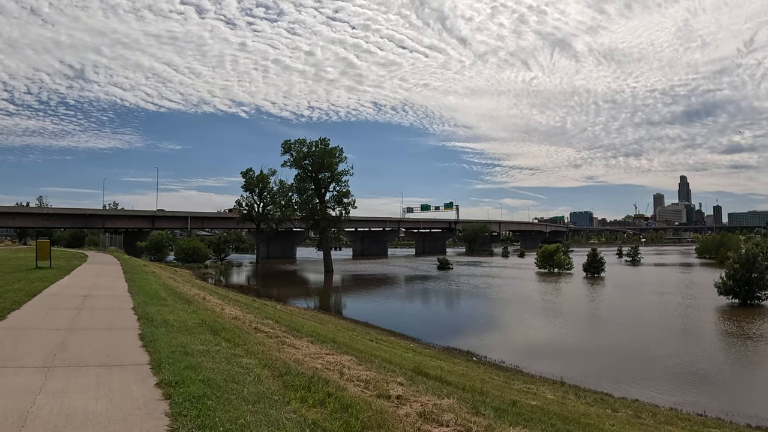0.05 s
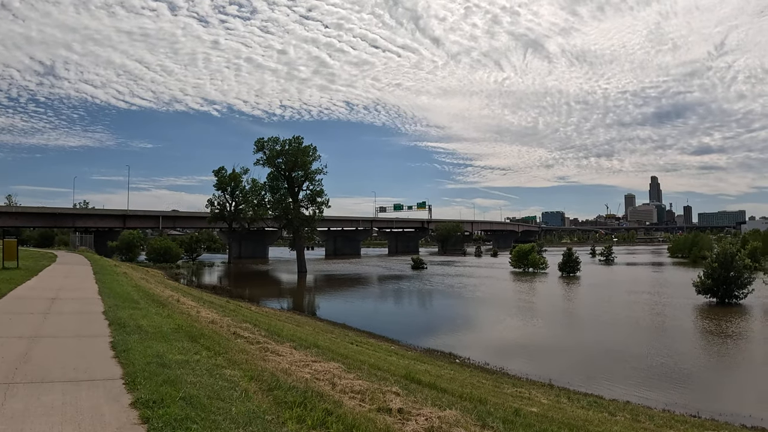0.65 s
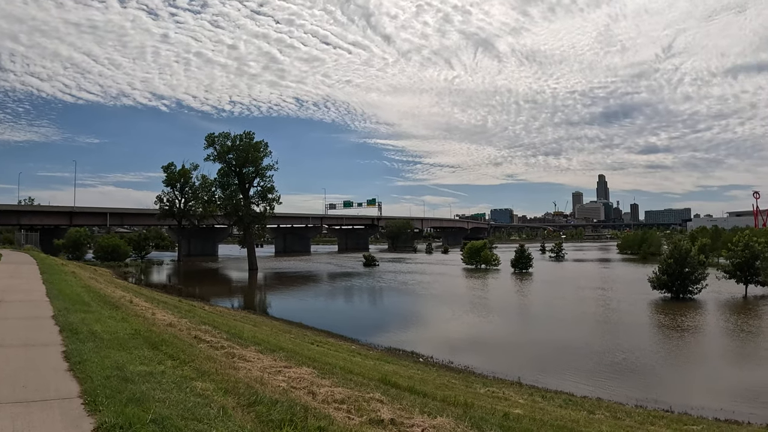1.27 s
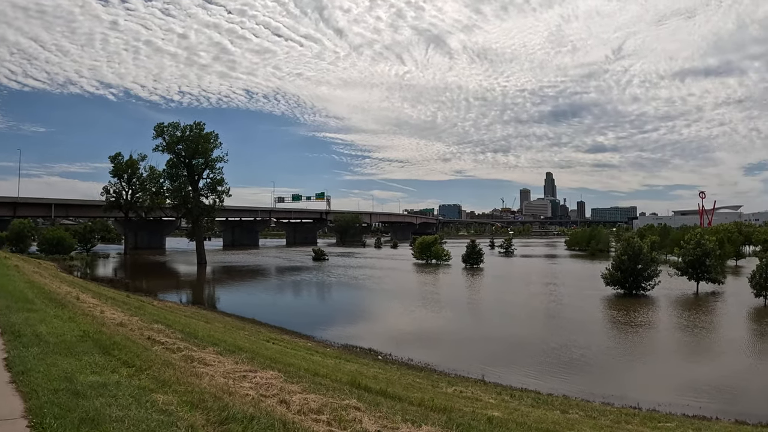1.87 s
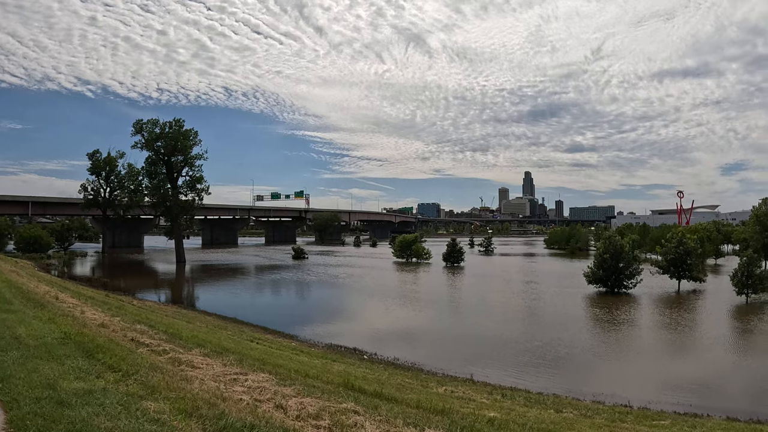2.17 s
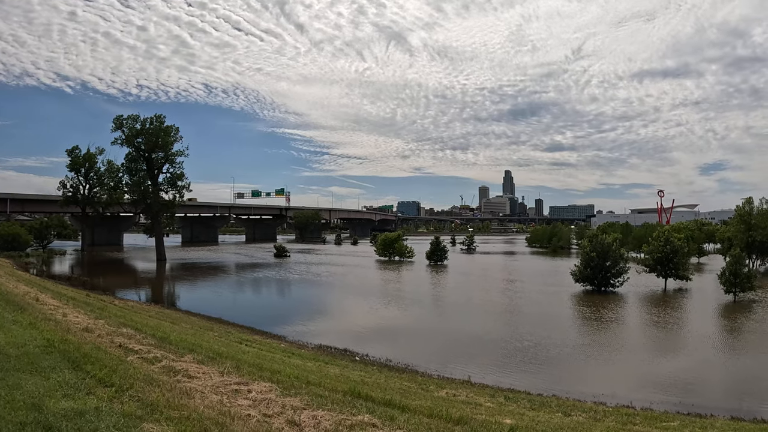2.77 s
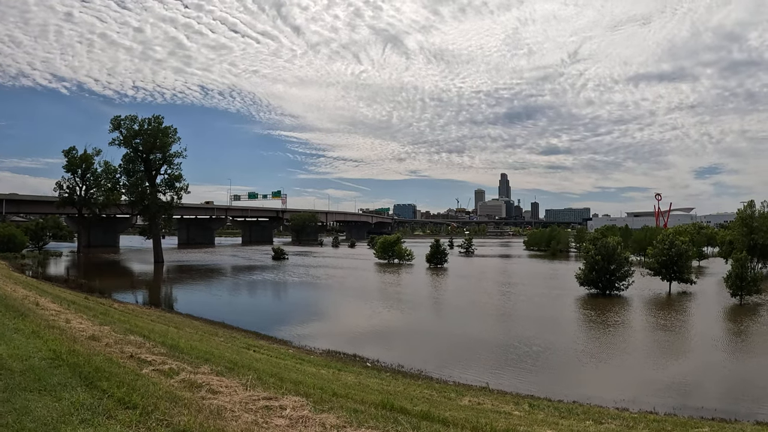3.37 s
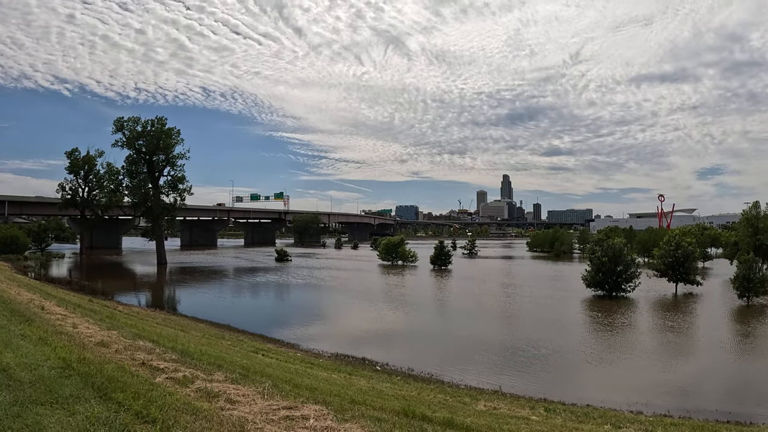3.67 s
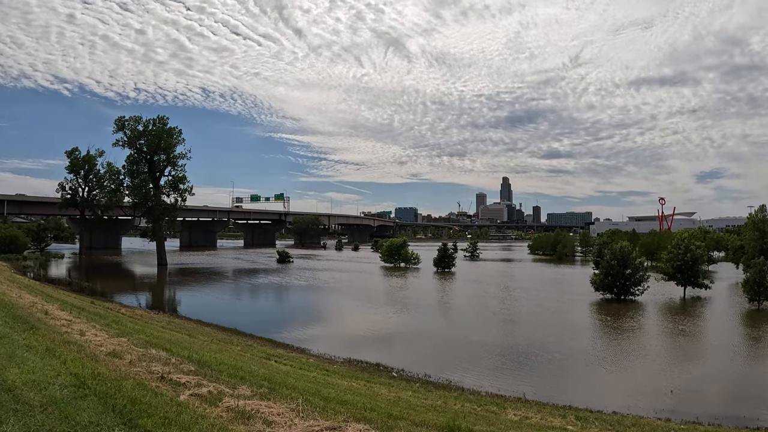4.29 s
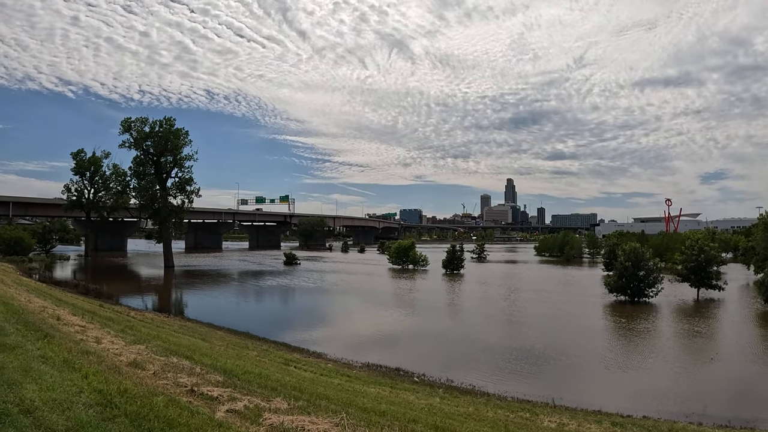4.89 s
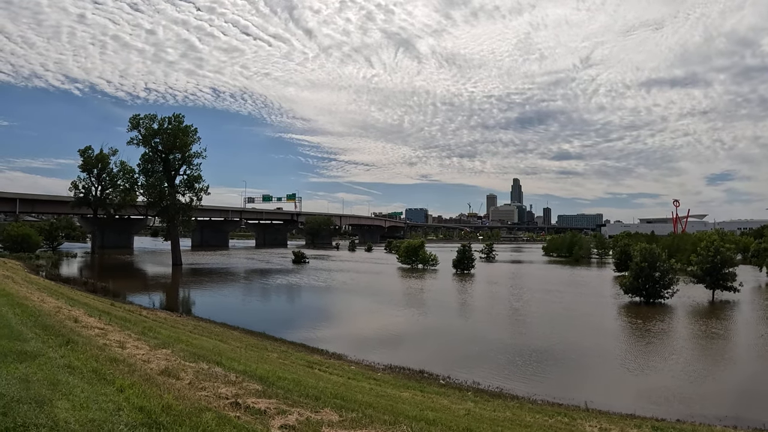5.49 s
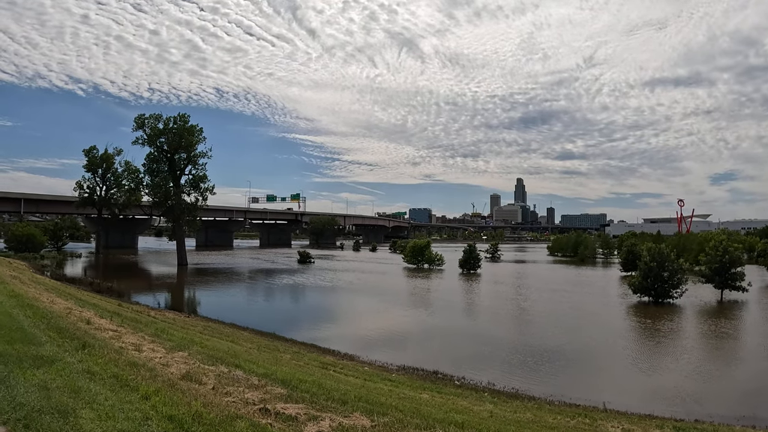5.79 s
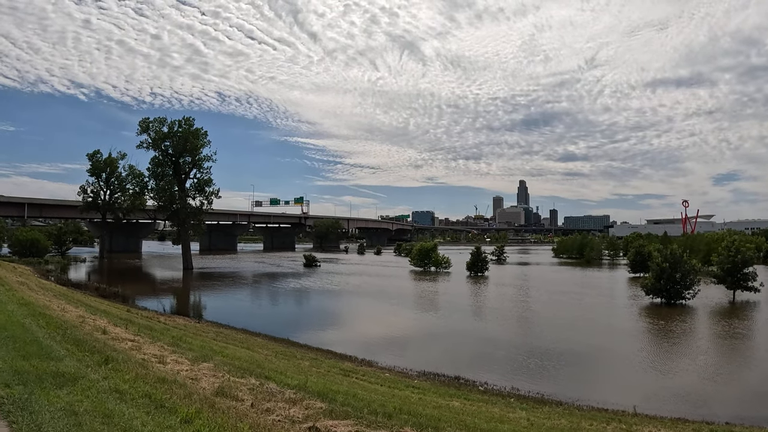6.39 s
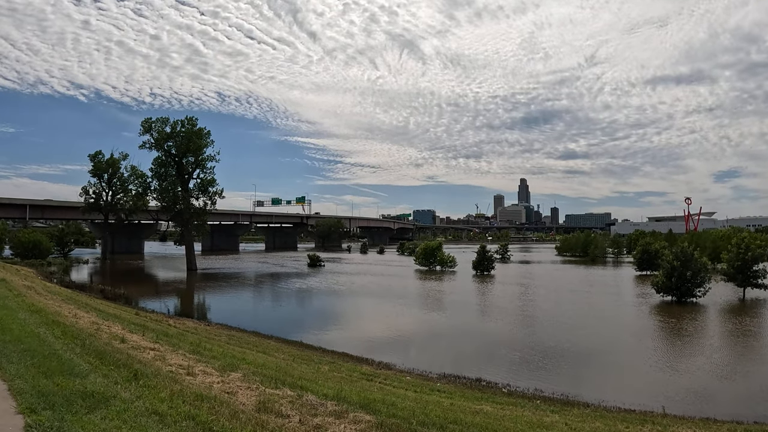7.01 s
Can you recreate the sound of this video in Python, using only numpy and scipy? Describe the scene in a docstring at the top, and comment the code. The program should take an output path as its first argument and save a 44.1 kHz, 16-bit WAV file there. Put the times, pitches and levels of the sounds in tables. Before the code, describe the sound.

A heavy engine climbs in pitch and holds over rumbling highway bridge traffic, while wind buffets the microphone and a small bird chips.

```python
"""A heavy engine climbs in pitch and holds on a highway bridge, heard from a grassy river bank.
Its exhaust beats against a second engine's drone; tyres roar and whine, and the deck rumbles.
Close by, two gusts buffet the microphone, a small bird chips, grass and clothing rustle, stalks snap.
Near the end the stereo image closes to mono and the treble dulls."""
import sys
import numpy as np
from scipy import signal
from scipy.fft import rfft, irfft, next_fast_len
from scipy.io import wavfile

SR = 44100
rng = np.random.default_rng(int(sys.argv[2]) if len(sys.argv) > 2 else 0)


def int16_out(signal):
    """Quantize to a 16-bit WAV file."""
    q = np.round(np.clip(np.atleast_2d(signal).T, -1, 1) * 32767)
    wavfile.write(sys.argv[1], SR, q.astype(np.int16))


N = 319725
TIME = np.arange(N) / SR
BINS = np.fft.rfftfreq(N, 1 / SR)


def gain_of(db):
    """Decibels to amplitude."""
    return 10 ** (np.asarray(db) / 20)


def unit_rms(x):
    """Scales to unit rms."""
    return x / np.sqrt(np.mean(x ** 2) + 1e-20)


def automation(points):
    """A breakpoint curve over time, at every sample."""
    return np.interp(TIME, *np.transpose(points))


def eq_curve(points, hz=BINS):
    """A breakpoint curve over log frequency."""
    point_hz, value = np.transpose(points)
    return np.interp(np.log(hz + 1), np.log(point_hz + 1), value)


def filtered(x, gain):
    """Applies a gain for each frequency."""
    return irfft(rfft(x) * gain, x.shape[-1])


def drift(rate_hz):
    """Smooth random modulation of unit rms, up to about rate_hz."""
    return unit_rms(filtered(rng.standard_normal(N), np.exp(-(BINS / rate_hz) ** 2)))


def stereo_noise(colour, correlation, size=N):
    """Coloured noise in two partly alike channels; their mean has unit rms."""
    mid, side = rfft(rng.standard_normal((2, size)))
    mid, side = mid * np.sqrt(1 + correlation), side * np.sqrt(1 - correlation)
    pair = irfft(np.array([mid + side, mid - side]) * colour, size)
    return pair / np.sqrt(np.mean(pair.mean(0) ** 2) + 1e-20)


def pan(left_db):
    """Channel gains that put the left left_db above the right."""
    return gain_of(np.array([[.5], [-.5]]) * left_db)


def add(mix, start_s, sound):
    """Mixes a stereo sound in at start_s."""
    part = mix[:, max(round(start_s * SR), 0):][:, :sound.shape[1]]
    part += sound[:, :part.shape[1]]


def add_centred(mix, peak_s, sound):
    """Mixes a stereo sound in with its middle at peak_s."""
    add(mix, peak_s - sound.shape[1] / SR / 2, sound)


def tone(hz):
    """A unit-rms sine that follows a pitch curve from a random phase."""
    return np.sqrt(2) * np.sin(2 * np.pi * (np.cumsum(hz) / SR + rng.random()))


def swell(width_s):
    """A short bell envelope, three widths to each side of its peak."""
    return np.exp(-np.linspace(-3, 3, 2 * int(3 * width_s * SR) + 2) ** 2)


def swell_at(peak_s, width_s):
    """A bell envelope on the scene's timeline."""
    return np.exp(-((TIME - peak_s) / width_s) ** 2)


def drone(hz, zero_phase_s=3.23):
    """An engine's fundamental: a gliding unit-rms sine with its phase pinned at one moment."""
    turns = np.cumsum(hz) / SR
    return np.sqrt(2) * np.sin(2 * np.pi * (turns - np.interp(zero_phase_s, TIME, turns)))


# Firing rate, climbing in two pulls and then holding: time_s, pitch_hz
ENGINE_PITCH = [(0, 92), (1.0, 97.5), (1.85, 105), (1.95, 111), (2.07, 126), (2.27, 143.5), (2.42, 146),
                (2.6, 160.6), (3.1, 161.1), (3.5, 162.4), (3.9, 164.8), (5.4, 168.3), (7.25, 163.5)]
# Engine fader: time_s, level_db
ENGINE_FADER = [(0, -35.5), (.25, -28.5), (.62, -28), (.85, -24), (1.7, -26.5), (2.12, -22.5), (2.27, -28),
                (2.6, -26), (3.9, -29.5), (4.6, -23), (5.3, -24), (5.5, -29.5), (5.85, -29), (6.05, -45.5),
                (6.35, -31.5), (6.75, -38), (6.98, -26.5), (7.25, -41.5)]
# Second harmonic against the fundamental: harmonic_hz, gain_db
ENGINE_OVERTONE = [(184, -6.5), (192, -12), (210, -14), (235, -23.5), (290, -27), (320, -36.5), (328, -20),
                   (333, -26.5), (336, -22.5)]


def heavy_engine(throb_db=0.4, trim_db=-0.67):
    """A throbbing exhaust; distance leaves only its lowest orders."""
    hz = automation(ENGINE_PITCH)
    firing = drone(hz) * gain_of(throb_db * drift(1.4))
    # Unequal cylinder banks add weak orders halfway between the harmonics.
    uneven = gain_of(-15) * tone(hz / 2) + gain_of(-29 + 2 * drift(3.5)) * tone(1.5 * hz)
    overtone = gain_of(eq_curve(ENGINE_OVERTONE, 2 * hz) + drift(2.5)) * tone(2 * hz)
    return gain_of(automation(ENGINE_FADER) + trim_db) * (firing + uneven + overtone)


def cruising_engine(start_hz=154.3, rise_hz_per_s=0.6, peak_db=-32, arrives_s=0.38, leaves_s=3.9,
                    fade_db_per_s=15.5, nearing_db_per_s=1.1):
    """A second drone swells in, draws nearer and fades, beating against the heavy engine."""
    away_s = np.maximum(arrives_s - TIME, 0) + np.maximum(TIME - leaves_s, 0)
    nearing_db = nearing_db_per_s * np.minimum(TIME - leaves_s, 0)
    level_db = peak_db + nearing_db - fade_db_per_s * away_s + 0.1 * drift(0.6)
    # Flipped polarity puts a null of the beat where the two drones' phases are pinned.
    return -gain_of(level_db) * drone(start_hz + rise_hz_per_s * TIME)


# How alike the traffic noise is left and right: frequency_hz, correlation
TRAFFIC_CORRELATION = [(25, 0.98), (100, 1), (200, 0.99), (330, 0.93), (530, 0.91), (900, 0.73),
                       (1500, 0.86), (2600, 0.52), (7000, 0.4)]
# Low end of the bridge deck: frequency_hz, gain_db
DECK_EQ = [(7, -16), (19, -4), (31, 2.5), (49, -4.5), (67, 2), (92, 1.5), (122, -6), (170, -6),
           (212, -18.5), (260, -24), (335, -43), (1500, -100)]
# Deck fader: time_s, level_db
DECK_FADER = [(0, -30.5), (.4, -29.5), (1.15, -29.5), (1.8, -32), (2.6, -32), (3.2, -29.5), (4.7, -32),
              (5.45, -29.5), (6.05, -35), (7.25, -33.5)]
# Colour of the mingled exhausts: frequency_hz, gain_db
EXHAUST_EQ = [(90, -3), (195, 1.5), (255, -1.5), (305, -7.5), (430, -10.5), (530, -8.5), (660, -8),
              (810, -12.5), (1300, -23), (7000, -100)]
# Exhaust fader: time_s, level_db
EXHAUST_FADER = [(0, -40), (1.1, -39), (2.7, -40), (4.0, -38.5), (6.1, -39), (7.25, -36)]


def rumble(deck_trim_db=2.5, exhaust_trim_db=-0.02):
    """The low bed: the deck shakes under the wheels, with a blur of many exhausts above it."""
    correlation = eq_curve(TRAFFIC_CORRELATION)
    deck = stereo_noise(gain_of(eq_curve(DECK_EQ)), correlation)
    deck *= gain_of(automation(DECK_FADER) + deck_trim_db)
    exhausts = stereo_noise(gain_of(eq_curve(EXHAUST_EQ)), correlation)
    exhausts *= gain_of(automation(EXHAUST_FADER) + exhaust_trim_db)
    return deck + exhausts


# Colour of the tyre roar: frequency_hz, gain_db
ROAR_EQ = [(240, -18), (510, -14.5), (670, -3), (820, -6), (970, 1), (1220, 0.5), (1510, -4.5),
           (1780, -5.5), (2450, -14), (3450, -20), (4600, -28), (7400, -37.5), (10200, -56.5), (14400, -65)]
# Roar fader: time_s, level_db
ROAR_FADER = [(0, -40.5), (.9, -42), (2.5, -43.5), (3.1, -42.5), (4.3, -41), (4.85, -40.5), (5.25, -39.5),
              (6.0, -44.5), (7.25, -42)]


def tyre_roar(crossover_hz=2400, flicker_db=0.5, waver_db=0.5):
    """A broad wash of tyres whose treble comes and goes with the breeze."""
    roar = stereo_noise(gain_of(eq_curve(ROAR_EQ)), eq_curve(TRAFFIC_CORRELATION))
    treble = filtered(roar, BINS ** 4 / (BINS ** 4 + crossover_hz ** 4))
    roar += treble * (gain_of(flicker_db * drift(16)) - 1)
    return roar * gain_of(automation(ROAR_FADER) + waver_db * drift(29))


def resonant_noise(size, pitch_hz, half_band_hz):
    """Noise in one narrow resonance."""
    detune = (np.fft.rfftfreq(size, 1 / SR) - pitch_hz) / half_band_hz
    return stereo_noise(1 / (1 + detune ** 2), correlation=0.38, size=size)


# Singing tyres passing: peak_s, width_s, level_db, pitch_hz, half_band_hz
TYRE_WHINES = [(4.1, 0.51, -47.5, 1218, 36), (5.15, 0.2, -45, 1257, 27), (5.22, 0.18, -50.5, 1870, 64),
               (5.401, .25, -50.5, 1424, 25), (5.63, 0.15, -42, 1252, 26), (5.95, .1, -48, 1262, 10),
               (6.36, .07, -49, 1420, 11), (6.74, 0.09, -46, 1270, 11), (7.069, 0.067, -53, 1310, 20),
               (7.2, .03, -39, 630, 44)]


def tyre_whines(bed_db=-56):
    """Tyres sing on the grooved deck, pitched by each vehicle's speed, over a faint steady whine."""
    out = gain_of(bed_db) * resonant_noise(N, pitch_hz=1250, half_band_hz=34)
    for peak_s, width_s, level_db, pitch_hz, half_band_hz in TYRE_WHINES:
        envelope = swell(width_s)
        whine = resonant_noise(next_fast_len(len(envelope)), pitch_hz, half_band_hz)
        add_centred(out, peak_s, gain_of(level_db) * envelope * whine[:, :len(envelope)])
    return out


# The far vehicle's partials at its closest: pitch_hz, level_db
FAR_PARTIALS = [(247, -56), (320, -58), (387.5, -50.5), (409, -56), (457.5, -49.5), (648, -55.5)]


def far_vehicle(wander_hz=1.4, distant_db=-13.5, nearest_s=6.98, approach_s=0.37):
    """Thin tones waver on their way through moving air and swell as the vehicle draws near."""
    partials = sum(gain_of(db) * tone(hz + wander_hz * drift(6.3)) for hz, db in FAR_PARTIALS)
    return partials * np.hypot(gain_of(distant_db), swell_at(nearest_s, approach_s))


# The traffic's lean to the left: frequency_hz, left_db
LEAN_PAN = [(60, -0.5), (140, -1), (320, 0.5), (490, 0), (740, 5), (1130, 2.5), (1720, 3.5), (2620, 4.5),
            (5000, 1.2), (9000, 1.5)]
# Depth of that lean: time_s, depth_factor
LEAN_DEPTH = [(0, 0.63), (2.5, 1.6), (4.6, 1.23), (5.7, .45), (7.25, .4)]


def from_left(traffic):
    """The bridge lies to the left; the camera body shades the right channel from its higher sounds."""
    shaded = filtered(traffic, pan(eq_curve(LEAN_PAN)))
    return traffic + automation(LEAN_DEPTH) * (shaded - traffic)


# Wind thumps, bunched in two gusts: peak_s, width_s, level_db, cutoff_hz, left_db
EDDIES = [(.18, 0.059, -24, 45.2, 2), (0.293, 0.02, -22.5, 277, -12.5), (.372, 0.028, -26.5, 227, -13),
          (.52, 0.029, -30, 240, -4.5), (0.684, 0.027, -17.5, 55, -1.5), (0.96, 0.028, -18, 60, 0),
          (1.1, 0.049, -21, 41.6, 0), (1.135, 0.035, -23.5, 224, -1), (1.234, 0.018, -19, 140, -0.5),
          (1.34, 0.043, -20, 38, 0), (1.72, 0.095, -27.5, 37.8, -1), (2.001, 0.018, -22, 150, -1.5),
          (2.28, 0.0403, -25, 52.4, 1.5), (5.52, 0.045, -20, 80, -4), (5.675, .024, -11.5, 105, -4.5),
          (5.676, .015, -27.5, 380, -11), (5.738, .04, -17.5, 266, -10.5), (5.739, .03, -20.5, 114, -3),
          (5.821, 0.057, -22, 113, -7), (6.124, 0.029, -31.5, 185, -21)]


def gusts(trim_db=-3, low_cut_hz=25, body_hz=70):
    """Eddies buffet the microphone, mostly on the right; faster ones reach higher in pitch."""
    out = np.zeros((2, N))
    for peak_s, width_s, level_db, cutoff_hz, left_db in EDDIES:
        envelope = swell(width_s)
        hz = np.fft.rfftfreq(len(envelope), 1 / SR)
        body = hz / (hz + low_cut_hz) / np.sqrt(1 + hz / body_hz)
        colour = body / np.sqrt(1 + (hz / cutoff_hz) ** 8)
        eddy = envelope * stereo_noise(colour, correlation=1, size=len(envelope))
        add_centred(out, peak_s, gain_of(level_db + trim_db) * eddy * pan(left_db))
    return out


# Chip shapes by note name: length_s, start_hz, middle_hz, end_hz, second_voice_offset_hz
BIRD_NOTES = {"arch": (.042, 3450, 4230, 3950, 0), "fall": (.052, 4150, 3820, 3200, 0),
              "low": (.03, 3500, 3620, 3480, 0), "high": (.07, 4350, 4400, 4300, 300),
              "rise": (.04, 2800, 2980, 3100, 0), "long": (.1, 3360, 3430, 3400, 110)}
# The bird's song: start_s, level_db, note_name
BIRD_SONG = [(.4, -63, "high"), (.47, -64, "high"), (.73, -58.5, "arch"), (.79, -59, "arch"),
             (.875, -49, "rise"), (1.06, -46, "rise"), (1.125, -51, "long"), (1.88, -55, "fall"),
             (1.99, -51, "arch"), (2.1, -51.5, "low"), (2.215, -55, "low"), (3.012, -53, "fall"),
             (3.123, -55, "arch"), (4.363, -54, "arch"), (5.705, -58, "arch")]


def bird(left_db=-1, trim_db=-6, scatter_db=-10, scatter_s=0.028, warble_hz=70):
    """Short warbling chips that arch, rise or fall, blurred by the leaves around the bird."""
    chips = np.zeros((2, N))
    warble = warble_hz * drift(250)
    for start_s, level_db, note_name in BIRD_SONG:
        length_s, *pitches_hz, offset_hz = BIRD_NOTES[note_name]
        progress = np.linspace(0, 1, int(length_s * SR))
        glide = np.polyval(np.polyfit([0, .5, 1], pitches_hz, 2), progress)
        hz = glide + warble[int(start_s * SR):][:len(progress)]
        voices = tone(hz) + (tone(hz + offset_hz) if offset_hz else 0)
        chip = np.sin(np.pi * progress) * voices
        add(chips, start_s, gain_of(level_db + trim_db) * chip * pan(left_db))
    leaf_tail = rng.standard_normal((2, SR // 2)) * np.exp(-TIME[:SR // 2] / scatter_s)
    leaf_tail /= np.linalg.norm(leaf_tail[0])
    return chips + gain_of(scatter_db) * signal.fftconvolve(chips, leaf_tail, axes=1)[:, :N]


def friction(strokes, eq, clump_db, left_db, catch_db=1):
    """Bursts of dry friction: millisecond grains bunch up as the blades catch and slip."""
    out = np.zeros((2, N))
    grains = unit_rms(gain_of(clump_db * drift(730) + catch_db * drift(55)))
    for peak_s, width_s, level_db, tilt_db in strokes:
        envelope = swell(width_s)
        hz = np.fft.rfftfreq(len(envelope), 1 / SR)
        colour = gain_of(eq_curve(eq, hz) + tilt_db * np.log2(1 + hz / 1000))
        hiss = stereo_noise(colour, correlation=0.55, size=len(envelope))
        add_centred(out, peak_s, gain_of(level_db) * envelope * hiss)
    return out * grains * pan(left_db)


# Swishes of grass and clothing: peak_s, width_s, level_db, tilt_db_per_octave
SWISHES = [(0.479, 0.13, -56.5, -10.5), (.625, 0.042, -52, -10), (.92, 0.1, -51, -12),
           (1.01, 0.1, -68, 5.5), (1.115, 0.04, -65, 4), (1.12, 0.051, -40, -17.5), (1.68, .1, -69, -3),
           (2.28, 0.22, -65.5, -7.5), (2.85, 0.086, -74, 3), (4.2, 0.35, -74.5, 13.5), (4.82, .1, -70.5, 1),
           (5.17, .13, -76, 0), (5.621, 0.13, -69, -2), (6.31, 0.039, -67, -1), (7.095, .035, -76, 5)]
# Colour of a swish before its tilt: frequency_hz, gain_db
SWISH_EQ = [(280, -20), (950, 2), (3100, 1), (5600, 3), (8100, -3.5), (10200, -14), (14000, -22)]


def rustles():
    """Blades and cloth brush in soft swishes."""
    return friction(SWISHES, SWISH_EQ, clump_db=3.5, left_db=6)


# Crackle of the smallest stalks: frequency_hz, gain_db
TICK_EQ = [(1000, -16.5), (4000, 0.5), (7000, 2), (10000, -9.5), (14000, -17)]


def stalk_ticks(ticks_per_s=45, level_db=-69, spread_db=4.5, decay_s=0.0007):
    """Dry stalks tick at random moments while the grass is being brushed."""
    brushing = sum(swell_at(peak_s, width_s) for peak_s, width_s, *_ in SWISHES)
    triggers = rng.random(N) < brushing * ticks_per_s / SR
    strengths = gain_of(spread_db * np.clip(rng.standard_normal(N), -2, 1.5))
    envelope = signal.lfilter([1], [1, -np.exp(-1 / (decay_s * SR))], triggers * strengths)
    return gain_of(level_db) * envelope * stereo_noise(gain_of(eq_curve(TICK_EQ)), correlation=0.45)


# Dry stalks breaking: start_s, level_db, ring_hz, half_band_ratio
STALK_SNAPS = [(1.053, -59, 6000, .7), (1.071, -54, 5500, .7), (1.253, -57, 6000, 0.35),
               (2.035, -51, 4500, 0.51), (2.903, -59, 6000, 0.55), (3.416, -56, 5500, 0.52),
               (4.223, -68, 11500, .5), (4.347, -52, 6500, .45), (4.482, -43, 4500, 0.47),
               (5.116, -59, 7200, .3), (5.507, -62, 7500, 0.32), (5.53, -51, 7300, .3),
               (5.589, -56, 5970, 0.42), (5.64, -63, 7500, .35), (5.729, -53, 5000, 0.54),
               (5.744, -60, 6500, 0.56), (6.6465, -65, 10500, .7), (6.6605, -54, 5500, .5),
               (6.667, -61, 9000, .8), (6.677, -45, 3200, .25), (6.688, -58, 9000, .6),
               (6.690, -37, 4400, 0.29), (6.6985, -41, 4800, .2), (6.707, -47, 8200, 0.33),
               (7.108, -65, 8000, .7)]


def stalk_snaps(attack_s=0.00059, left_db=2):
    """Each stalk breaks with a short burst: stiff ones ring at a pitch, limp ones just crack."""
    out = np.zeros((2, N))
    t = TIME[:SR // 80]
    hz = np.fft.rfftfreq(len(t), 1 / SR)
    envelope = t / attack_s * np.exp(1 - t / attack_s)
    for start_s, level_db, ring_hz, half_band_ratio in STALK_SNAPS:
        detune = (hz / ring_hz - 1) / half_band_ratio
        ring = stereo_noise(1 / (1 + detune ** 2) ** 2, correlation=0.66, size=len(t))
        snap = unit_rms(envelope * ring) * np.sqrt(np.mean(envelope ** 2))
        add(out, start_s, gain_of(level_db) * snap * pan(left_db))
    return out


# Brief swelling engine tones: peak_s, width_s, level_db, pitch_hz
ENGINE_SWELLS = [(1.25, 0.31, -52.5, 465.4), (3.25, 0.43, -33, 66.1), (3.279, 0.14, -54.5, 394),
                 (4.13, 0.18, -50, 383), (4.65, 0.35, -32, 95), (5.25, .3, -30.5, 63.13),
                 (5.35, .4, -46, 251), (5.4, 0.28, -33.5, 91.9), (6.15, 0.18, -34.5, 86),
                 (6.2, .3, -47, 247), (6.75, 0.16, -32, 64.5)]


def engine_swells(wander_hz=2.49):
    """Unsteady tones swell and fade: other diesels, and the heavy engine's 1.5 order near 250 Hz."""
    return sum(gain_of(level_db) * swell_at(peak_s, width_s) * tone(pitch_hz + wander_hz * drift(5))
               for peak_s, width_s, level_db, pitch_hz in ENGINE_SWELLS)


# Close, dry scuffs: peak_s, width_s, level_db, tilt_db_per_octave
DRY_SCUFFS = [(4.357, 0.013, -46, -6), (4.487, 0.007, -45, -14), (5.54, 0.016, -55.5, -6),
              (5.735, 0.017, -54, -16), (6.695, 0.03, -53.5, -2)]
# Colour of a scuff before its tilt: frequency_hz, gain_db
SCUFF_EQ = [(300, -30.5), (1500, -6), (3300, 4.5), (5300, -0.5), (8300, -2), (10500, -23.5), (14000, -17)]


def scuffs():
    """Short, hard strokes of dry friction."""
    return friction(DRY_SCUFFS, SCUFF_EQ, clump_db=2, left_db=4.5)


def scene():
    """The traffic across the water, with the small sounds of the bank in front."""
    engines = (heavy_engine() + cruising_engine()) * pan(left_db=0.56)
    traffic = from_left(rumble() + tyre_roar() + tyre_whines() + far_vehicle() + engine_swells())
    bank = gusts() + bird() + rustles() + stalk_ticks() + stalk_snaps() + scuffs()
    return engines + traffic + bank


# The treble dip at full depth: frequency_hz, gain_db
DULL_EQ = [(1150, -0.5), (1850, -2.5), (3400, -1.5), (5300, -7.5), (7600, -9.5), (12000, 1.5)]


def record(dry):
    """After the strong gust the image closes to mono and the treble dulls; a low-pass tops the mix."""
    close_s, close_db_per_s = 5.96, 46.5
    dull_s, dull_over_s, cutoff_hz = 5.75, 0.35, 14400
    width = gain_of(-close_db_per_s * np.maximum(TIME - close_s, 0))
    mid, side = dry.mean(0), (dry[0] - dry[1]) / 2 * width
    narrowed = np.array([mid + side, mid - side])
    crossfade = np.clip((TIME - dull_s) / dull_over_s, 0, 1)
    dulled = narrowed + crossfade * (filtered(narrowed, gain_of(eq_curve(DULL_EQ))) - narrowed)
    low_pass = signal.firwin(511, cutoff_hz, window=("kaiser", 9), fs=SR)
    return signal.oaconvolve(dulled, low_pass[None], "same")


dry = scene()
out = record(dry)
int16_out(out)
```